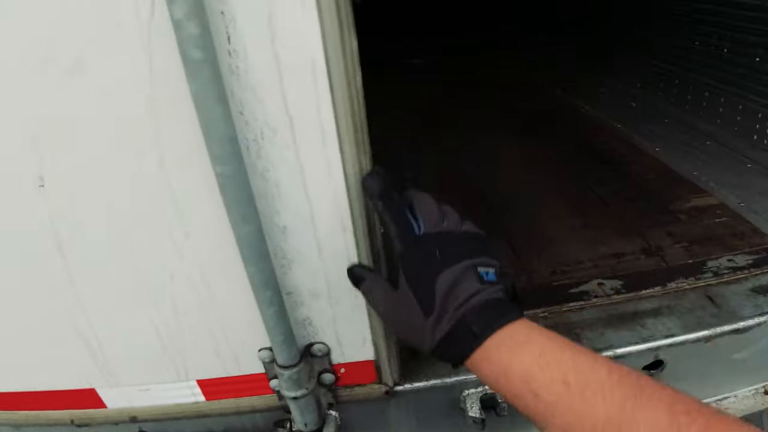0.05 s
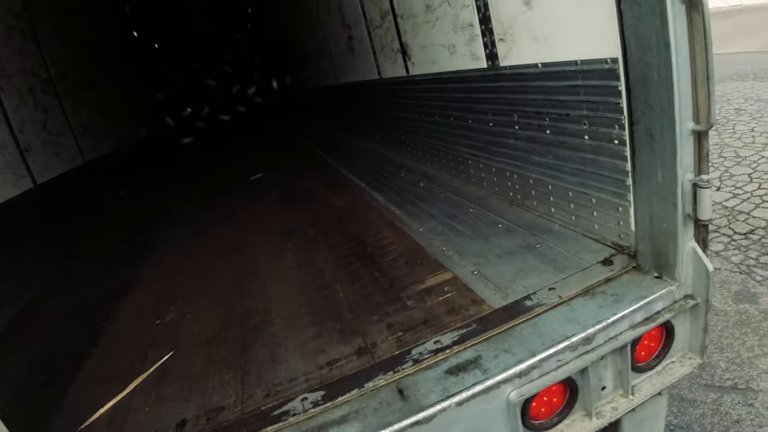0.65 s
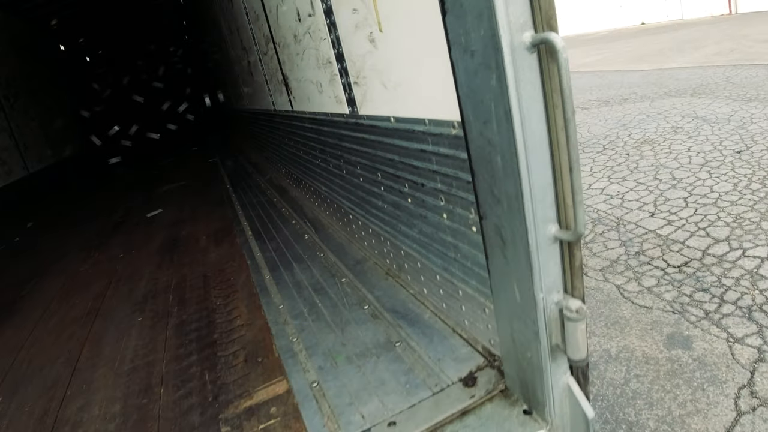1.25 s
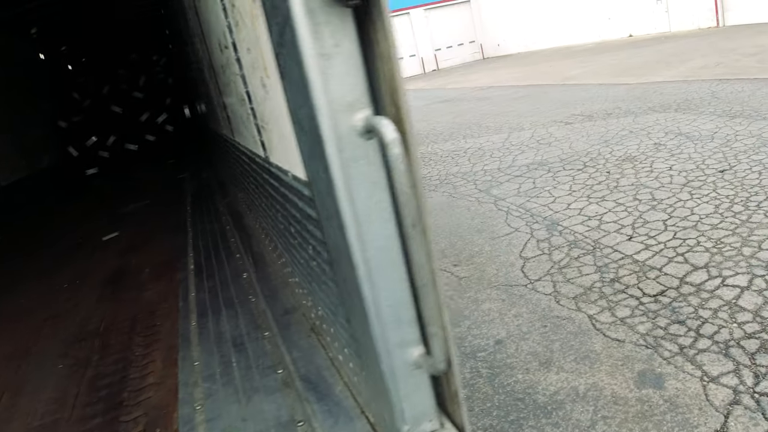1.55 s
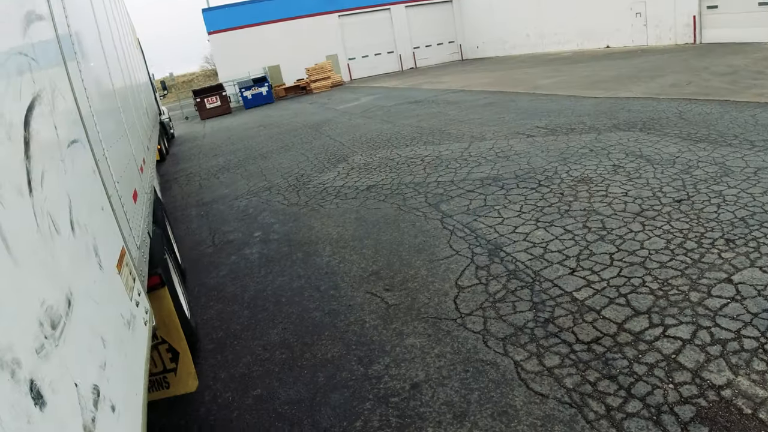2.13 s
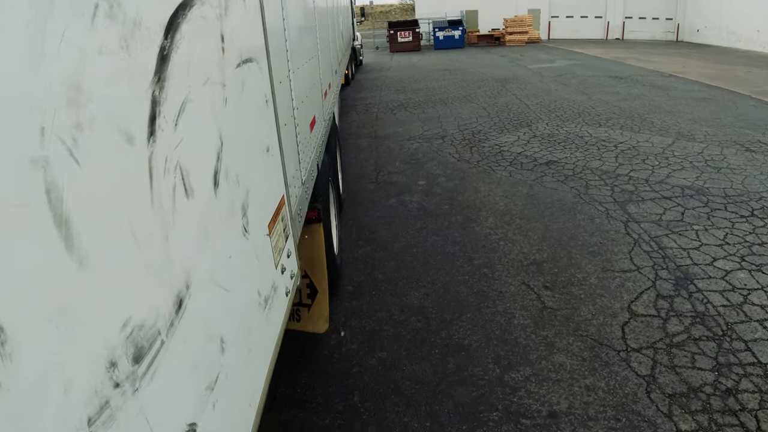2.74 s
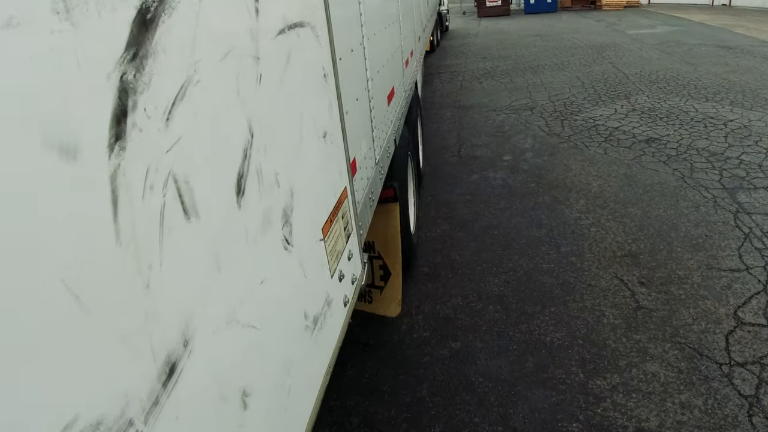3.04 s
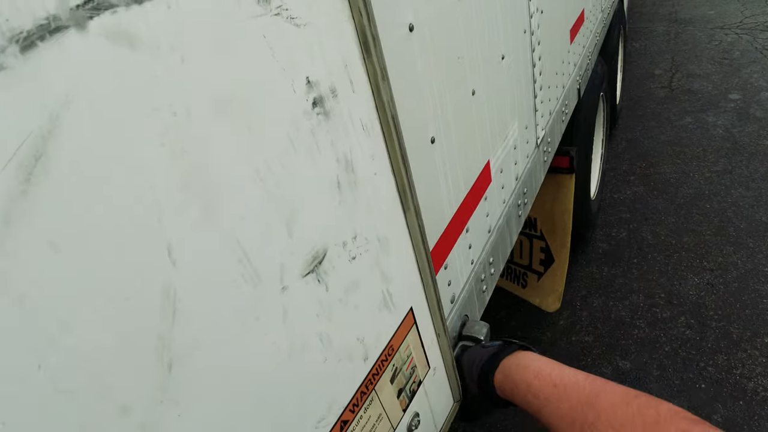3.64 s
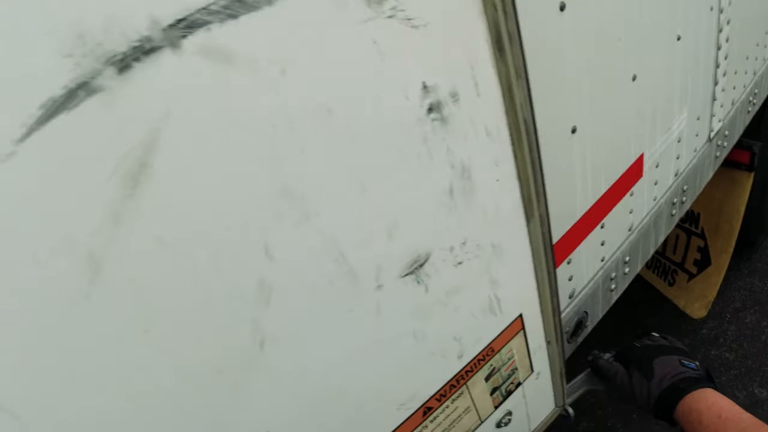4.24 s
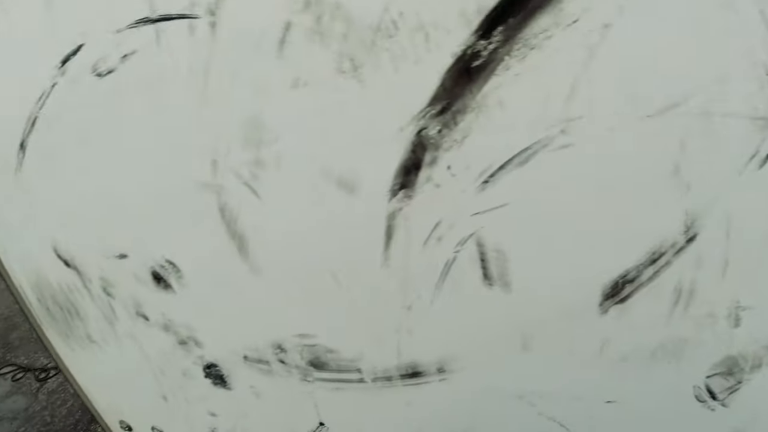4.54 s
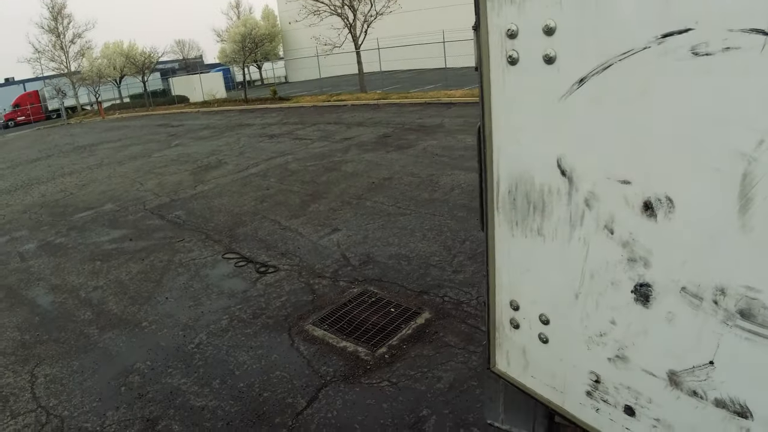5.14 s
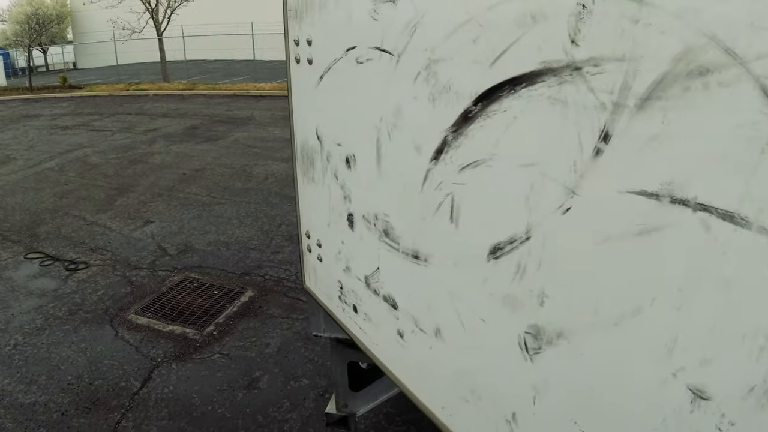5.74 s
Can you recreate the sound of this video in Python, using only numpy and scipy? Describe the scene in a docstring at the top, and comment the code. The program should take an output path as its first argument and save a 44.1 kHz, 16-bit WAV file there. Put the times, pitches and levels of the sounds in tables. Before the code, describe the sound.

A glove rubs a trailer door, then its steel hook clanks, rattles and booms against the panel, over a truck idling.

```python
"""A paved lot, a truck idling; a close pair of microphones is walked along by a tall trailer door.
First a glove rubs the panel and hisses off its edge; steps thump and the door scrapes, swung by hand.
From 3.7 s, close up, the steel hold-back hook clanks, chatters, squeaks and snaps at its keeper,
and each blow sets the panel booming against the hollow trailer.
At 5.6 s the latch clicks home with a last clank and boom, and the engine idles on."""
import sys
import numpy as np
from scipy import signal
from scipy.fft import irfft, next_fast_len
from scipy.io import wavfile
from scipy.ndimage import uniform_filter1d, minimum_filter1d

SR = 44100
rng = np.random.default_rng(int(sys.argv[2]) if len(sys.argv) > 2 else 0)


def file_out(sig):
    """Save sig as 16-bit WAV at sys.argv[1]."""
    # one column per channel
    cols = np.atleast_2d(sig).T
    # limit, then scale
    lim = np.clip(cols, -1, 1)
    pcm = np.round(lim * 32767).astype(np.int16)
    wavfile.write(sys.argv[1], SR, pcm)


N = 263718
TIME = np.arange(N) / SR

# how alike the two microphones hear diffuse sound: f/Hz, correlation
MIC_LIKENESS = [(25, .75), (60, .85), (130, .965), (300, .98), (640, .94), (1400, .62), (2400, .15),
                (4000, -.05), (8000, .05), (16000, .1)]
# the idling engine's spectrum: f/Hz, relative level/dB
ENGINE_SPECTRUM = [(15, -33), (27, -6.5), (55, 1), (78, -3.5), (105, -5.5), (190, -11.5), (270, -9),
                   (360, -21), (450, -13.5), (600, -18), (930, -16), (1310, -21.5), (2000, -29),
                   (2560, -35.5), (3260, -36), (4040, -45), (9000, -59), (14000, -64.5), (15500, -86.5)]
# peaks on that spectrum: f/Hz, width/Hz, boost/dB
ENGINE_RESONANCES = [(109.5, 19, 8.5), (915, 35, 0), (3300, 130, 1.5), (6030, 160, 6.5), (7860, 75, 7)]
# the engine as the trailer hides or uncovers it: t/s, rumble/dB, body/dB, clatter/dB, hiss/dB
ENGINE_LEVELS = [(.5, -43, -45, -57.5, -75.5), (.82, -38.5, -44, -57.5, -71),
                 (1.08, -42, -43.5, -59.5, -80), (1.3, -42, -42.5, -56.5, -75),
                 (1.8, -42.5, -43.5, -58, -76), (2.05, -38.5, -43, -54, -72.5),
                 (2.25, -35.5, -40, -51, -67), (2.55, -35, -42.5, -52, -74.5),
                 (2.78, -34.5, -40.5, -50.5, -70), (3.35, -27, -36.5, -48, -66.5),
                 (4.6, -33, -36.5, -49, -68), (5.05, -39, -41, -53.5, -68),
                 (5.45, -37.5, -40.5, -55.5, -68), (5.9, -27.5, -37, -50, -63.5)]
# echoes off the trailer and the ground: delay/s, gain
REFLECTIONS = [(.0055, .33), (.012, .2), (.027, .3)]
# machinery walked past: f/Hz, width/Hz, far level/dB, swell/dB, nearest t/s, passing time/s
MACHINE_DRONES = [(89.3, 6.7, -54, 15.5, 4.3, 1.6), (110.3, 6.3, -52.5, 20.5, 4.79, 0.32),
                  (189.5, 16, -51, 8, 1.1, 0.42), (705, 180, -61, 24.5, 3.4, 1.34),
                  (708, 12, -65, 27.5, 3.5, .8), (708, 10, -65.5, 19.5, 5.2, .2),
                  (6000, 110, -99, 21, 5.4, .8), (7860, 30, -98, 19, 3.7, 0.73)]
# a hum that comes and goes as the microphones move: t/s, level/dB
HUM_LEVELS = [(.1, -52), (.35, -42.5), (.6, -52), (.85, -46), (1.3, -51), (1.6, -47.5), (1.85, -49),
              (2.05, -49), (2.25, -42.5), (2.5, -38), (2.8, -39.5), (3.0, -48), (3.5, -43), (4.6, -45.5),
              (5.05, -56), (5.9, -52)]
# steps and handling: t/s, level/dB, centre f/Hz
SOFT_THUMPS = [(0.774, -30.5, 135), (1.204, -30, 110), (2.101, -27, 103), (2.69, -28, 203),
               (3.154, -22, 108.3), (3.481, -23.5, 152), (5.031, -26, 110), (5.177, -23.5, 115.4)]
# the swinging door scrapes: t/s, hold/s, level/dB, rasp f/Hz, rasp boost/dB
DOOR_SCRAPES = [(1.195, 0.41, -59.5, 2930, 6), (2.78, 1, -57.5, 3200, 13), (4.402, .17, -51.5, 2750, 9),
                (5.91, .1, -45.5, 3150, 14)]
# spectra of that scrape, the glove on the panel and the glove on the edge: f/Hz, relative level/dB
SCRAPE_SPECTRUM = [(1200, -18), (2200, 3), (2800, 1.5), (3400, -3), (4000, -17), (6000, -23), (12000, -53)]
RUB_SPECTRUM = [(25, -23), (60, 1), (150, -8.5), (320, -2.5), (500, -10.5), (630, -8.5), (750, -9),
                (930, -5), (1400, -15.5), (2400, -18), (3300, -20), (6000, -41), (12000, -74)]
HISS_SPECTRUM = [(1200, -21), (2500, -5), (4500, 0.5), (6500, -4.5), (8400, -5.5), (10000, -12.5),
                 (13000, -20), (16000, -31)]
# the glove's strokes along the edge: t/s, attack/s, hold/s, level/dB
EDGE_STROKES = [(0, 0.021, 0.058, -46), (0.07, 0.038, 0.018, -38)]
# loose hardware ticks: t/s, level/dB
HARDWARE_TICKS = [(1.215, -68), (1.285, -64), (1.678, -66), (1.704, -57.5), (1.727, -65), (1.916, -60),
                  (3.224, -62), (3.504, -59)]
# modes of the latch, hook, steel rods and door panel: f/Hz, relative level/dB, t60/s
LATCH_MODES = [(722, -11, .1), (1015, -9.5, 0.14), (1205, -5.5, 0.12), (1440, -9.5, .1), (1676, -9.5, .067),
               (1820, -10, .036), (2060, -8, 0.06), (2270, -4, 0.049), (2550, -7, .037), (3080, -18, .04),
               (3890, -5, 0.04), (4500, -7.5, 0.037), (4860, -13, 0.038), (5400, -15, .034),
               (5700, -14, 0.034), (6230, -19, .03), (6340, -19, .03), (6700, -20, .034),
               (7100, -19.5, .03), (7860, -28, .04), (8200, -26, .035)]
HOOK_MODES = [(1410, 5.5, 0.15), (1670, -0.5, 0.15), (1747, -1.5, 0.097), (2100, -4.5, .082),
              (2342, -5, 0.067), (2540, -5.5, 0.1), (2780, -4.5, .15), (2970, -5.5, .1),
              (3050, -2.5, 0.063), (3200, -2, 0.11), (3380, -1.5, 0.083), (3780, -7.5, 0.11),
              (4100, -11, 0.097), (4187, -12.5, .1), (4500, -14, .07)]
ROD_MODES = [(628, 9, 0.077), (659.4, 8, 0.056), (728, 0.5, .05), (753, 1, .1), (835, -0.5, 0.11),
             (891.4, 1.5, 0.14), (1100, -7.5, .06), (1220, -14, .06), (1300, -14, .07), (1510, -12.5, .07),
             (1740, -17, .08), (2300, -21.5, .08)]
PANEL_MODES = [(44.3, -13, 0.28), (60, -13, 0.29), (112.2, -5.5, .7), (134.3, -8.5, 0.3),
               (157.9, -5.5, 0.39), (178.3, 0, 0.47), (205.4, -2.5, .34), (241.4, -2, 0.21),
               (276.3, -3, 0.37), (319.8, 1.5, 0.3), (379.5, -1, 0.27), (438.8, 2, 0.24),
               (488.2, -1.5, .35), (531, -11.5, 0.19)]
# spectra of the hook's dense rattle and the snap of steel on steel: f/Hz, relative level/dB
RATTLE_SPECTRUM = [(700, -22.5), (1300, 5), (2000, -7.5), (2600, 2), (3000, -4.5), (3300, 3.5),
                   (3750, -7.5), (4400, -23), (5500, -30.5), (7000, -38.5), (8000, -37), (9000, -49.5),
                   (16000, -64.5)]
SNAP_SPECTRUM = [(1500, -26), (3500, 7), (4500, 4), (5800, -2.5), (7000, -11), (7700, -7.5), (8500, -0.5),
                 (9400, -21), (10300, -8), (12000, -23), (14000, -14), (16000, -39)]
# the hook binds, sagging in pitch and growing louder until it slips: t/s, f/Hz, level/dB
SQUEAK_PATH = [(3.965, 5600, -85), (3.975, 5480, -66), (3.985, 5200, -62), (3.992, 5190, -55),
               (3.999, 5200, -55), (4.003, 5230, -45), (4.008, 5240, -45), (4.013, 5230, -40),
               (4.018, 5250, -49), (4.024, 5250, -65), (4.032, 5250, -100)]
# the hook is dragged over its keeper: t/s, length/s, level/dB
HOOK_DRAGS = [(3.733, .125, -31), (4.222, .12, -32)]
# the loose panel flexes and rings in the modes near a pitch: t/s, level/dB, f/Hz
PANEL_FLEXES = [(3.735, -15, 178), (3.775, -18, 65), (3.782, -18, 235), (3.831, -19, 178),
                (3.835, -25, 105), (4.042, -18, 112), (4.075, -13.5, 241), (4.085, -15.5, 321),
                (4.13, -22, 206), (4.285, -18.5, 61), (4.31, -11.5, 61), (4.325, -14, 170),
                (4.335, -18, 275), (4.366, -13.5, 44), (4.402, -13.5, 437), (4.42, -21, 160),
                (4.545, -17.5, 165), (4.604, -15.5, 145), (4.70, -26, 112), (5.59, -18, 149),
                (5.628, -17.5, 112)]
# hook and rods strike: t/s, clank/dB, clank f/Hz, rattle/dB, rattle f/Hz, snap/dB, boom/dB, boom f/Hz
HOOK_BLOWS = [(3.705, -34, 700, -34.5, 2700, -72, -19, 218), (3.722, -11, 857, -19.5, 1600, -45, -14, 246),
              (3.753, -27, 1000, -37, 1500, -70, -17.5, 400),
              (3.777, -19.5, 850, -22.5, 2500, -64, -17.5, 239),
              (3.787, -25, 900, -29.5, 3600, -60, -20, 300),
              (3.809, -13.5, 860, -29, 1900, -69, -15.5, 178),
              (3.820, -10.5, 640, -32, 3000, -63, -29.5, 181),
              (3.829, -14.5, 686, -30, 4200, -45.5, -27, 177),
              (3.892, -15, 700, -32, 2600, -68, -16.5, 250),
              (3.955, -31.5, 900, -47, 1500, -67, -20.5, 320),
              (4.035, -21, 800, -25, 2490, -55, -21.5, 200), (4.0446, -14, 830, -17, 3100, -30, -8.5, 242),
              (4.053, -16.5, 950, -25.5, 3300, -26, -13.5, 260),
              (4.218, -26.5, 850, -45, 2000, -62.5, -17.5, 266),
              (4.264, -16.5, 860, -21.5, 3100, -43, -15.5, 250),
              (4.279, -20, 840, -29.5, 3350, -54.5, -13.5, 294),
              (4.3933, -12.5, 760, -38, 1890, -48, -11, 299),
              (5.5915, -13.5, 750, -33, 2200, -41.5, -21, 170),
              (5.601, -16.5, 720, -50, 1500, -66, -24, 400), (5.623, -26, 740, -56, 1500, -60, -21.5, 149)]

# each part's sound reaches the left microphone this much later
DOOR_LAG_MS, HOOK_LAG_MS, SNAP_LAG_MS, LATCH_LAG_MS = .049, .045, .076, .148
PANEL_WIDTH_HZ, ROD_WIDTH_HZ, HOOK_WIDTH_HZ = 13, 32, 60  # resonance widths under dense excitation


def gain_of(db):
    """Decibels to amplitude."""
    return 10 ** (np.asarray(db) / 20)


def unit_rms(x):
    """Scales to rms 1."""
    return x / np.sqrt(np.mean(x ** 2) + 1e-20)


def curve_at(points, hz):
    """Interpolates a curve on a log-frequency axis."""
    f, value = np.transpose(points)
    return np.interp(np.log(hz + 1), np.log(f + 1), value)


def fader(rows, column=1):
    """One dB column of a timed table as a gain for every sample."""
    rows = np.array(rows)
    return gain_of(np.interp(TIME, rows[:, 0], rows[:, column]))


def add(mix, s, sound):
    """Mixes a stereo sound in at time s."""
    part = mix[:, round(s * SR):][:, :sound.shape[1]]
    part += sound[:, :part.shape[1]]


def wander(rate_hz):
    """A random drift of rms 1."""
    knots = rng.standard_normal(2000)
    return unit_rms(np.interp(TIME * rate_hz, np.arange(len(knots)), knots))


def decay(t, t60, rise):
    """A quick, smooth rise and an exponential decay."""
    return (1 - np.exp(-2 * t / rise)) ** 2 * np.exp(-np.log(1000) * t / t60)


def envelope(start, attack, hold, fall_db_per_s):
    """A smooth attack, a hold, and a steady fall in dB."""
    t = TIME - start
    onset = np.sin(np.pi / 2 * np.clip(t / attack, 0, 1)) ** 2
    return onset * gain_of(-fall_db_per_s * np.maximum(t - attack - hold, 0))


def hump(hz, centre_hz, octaves):
    """A rounded rise about a centre, with sloping skirts, in dB."""
    distance = abs(np.log2((hz + 1) / centre_hz))
    return -10 * np.log10(1 + (distance / octaves) ** 2) - 6 * np.maximum(distance - 1, 0)


def lowpass(hz, top_hz):
    """A steep low-pass, in dB."""
    return -10 * np.log10(1 + (hz / top_hz) ** 10)


def peak(x, centre, width):
    """A resonance-shaped bell of height 1; width is taken at half height."""
    return 1 / (1 + (2 * (x - centre) / width) ** 2)


def resonances(modes, width_hz, hz):
    """The response of a set of modes, in dB."""
    return 10 * np.log10(sum(gain_of(db) ** 2 * peak(hz, f, width_hz) for f, db, _ in modes))


def noise(colour_db, size=N, lag_ms=0, direct=0):
    """Coloured noise of rms 1 at the pair: alike in the bass, in the treble only by its direct share."""
    padded = next_fast_len(size)
    hz = np.fft.rfftfreq(padded, 1 / SR)
    left, unrelated = np.exp(2j * np.pi * rng.random((2, len(hz))))
    likeness = np.clip(direct + (1 - direct) * curve_at(MIC_LIKENESS, hz), -1, 1)
    right = likeness * left + np.sqrt(1 - likeness ** 2) * unrelated
    pair = np.array([left * np.exp(-2j * np.pi * hz * lag_ms / 1000), right])
    return unit_rms(irfft(pair * gain_of(colour_db(hz)), padded)[:, :size])


def narrow_noise(centre_hz, width_hz):
    """A narrow band of noise with steep skirts."""
    return noise(lambda hz: 20 * np.log10(peak(hz, centre_hz, width_hz)))


def ring(modes, centre_hz, t, lag_ms, octaves, rise):
    """Damped modes at the pair; the place of the blow favours those near a centre."""
    hz, db, t60 = np.transpose(modes)[:, :, None]
    weights = gain_of(db + hump(hz, centre_hz, octaves))
    cycles = hz * rng.uniform(.992, 1.008, hz.shape) * t + rng.random(hz.shape)
    partials = weights * decay(t, t60, rise) * np.sin(2 * np.pi * cycles)
    wave = partials.sum(0) / np.linalg.norm(weights)
    return np.array([np.interp(t - lag_ms / 1000, t, wave), wave])


def engine():
    """The truck idles in the background in four fluttering bands, combed by trailer and ground echoes."""
    def colour(hz):
        peaks = sum(db * peak(hz, f, width) for f, width, db in ENGINE_RESONANCES)
        return curve_at(ENGINE_SPECTRUM, hz) + peaks

    def band(low_hz, high_hz, flutter_db):
        steady = noise(lambda hz: colour(hz) - 10 * np.log10(1 + (low_hz / (hz + 1)) ** 10)
                       + lowpass(hz, high_hz), lag_ms=.077)
        return steady * gain_of(flutter_db * (shared_flutter + wander(14)) / np.sqrt(2))

    shared_flutter = wander(45)
    rumble = band(20, 294, flutter_db=3) * fader(ENGINE_LEVELS, 1)
    body = band(280, 1384, flutter_db=1.44) * fader(ENGINE_LEVELS, 2)
    clatter = band(1590, 4540, flutter_db=1.9) * fader(ENGINE_LEVELS, 3)
    hiss = band(4260, 12000, flutter_db=1) * fader(ENGINE_LEVELS, 4)
    idle = rumble + body + clatter + hiss
    heard = idle.copy()
    for delay, gain in REFLECTIONS:  # the paths drift as the microphones move
        late = np.round((TIME - delay - .0003 * wander(1.2)) * SR).astype(int)
        heard += gain * idle[:, late % N]
    return heard


def drones():
    """Running machinery: each narrow band wavers by itself and swells as the microphones pass."""
    out = np.zeros((2, N))
    for hz, width_hz, far_db, swell_db, nearest_s, pass_s in MACHINE_DRONES:
        passing_db = far_db + swell_db * peak(TIME, nearest_s, 2 * pass_s)
        out += narrow_noise(hz, width_hz) * gain_of(passing_db + 1.5 * wander(15))
    return out


def hum(pitch_hz=463, waver_hz=4.5, flicker_db=1.6):
    """One fuzzy tone of the machinery, wavering in pitch and flickering in level."""
    tone = np.sin(2 * np.pi * np.cumsum(pitch_hz + waver_hz * wander(60)) / SR)
    fuzzy = unit_rms(tone) + .65 * narrow_noise(pitch_hz, width_hz=30)
    return unit_rms(fuzzy * gain_of(flicker_db * wander(16))) * fader(HUM_LEVELS)


def thumps():
    """Steps and handling reach the microphones as short, dull pushes of air."""
    t, out = np.arange(SR // 4) / SR, np.zeros((2, N))
    for s, db, centre_hz in SOFT_THUMPS:
        push = noise(lambda hz: 2 * hump(hz, centre_hz, octaves=.41), len(t))
        add(out, s, 1.32 * gain_of(db) * push * decay(t, t60=.2, rise=.017))
    return out


def scrape(rasp_width_hz=550, grain_db=2):
    """The door swings: dry, grainy friction rasps in one resonance of the steel."""
    out = np.zeros((2, N))
    for s, hold, db, rasp_hz, rasp_db in DOOR_SCRAPES:
        friction = noise(lambda hz: curve_at(SCRAPE_SPECTRUM, hz)
                         + rasp_db * peak(hz, rasp_hz, rasp_width_hz))
        out += friction * gain_of(db) * envelope(s, .028, hold, fall_db_per_s=149)
    return out * gain_of(grain_db * wander(200))


def glove(rub_db=-27, fade_db_per_s=47, buffet_db=-33):
    """A glove rubs the panel and hisses off its edge; air pushed by the door buffets the microphones."""
    pressure = gain_of(rub_db - fade_db_per_s * TIME) * envelope(0, .00067, .28, fall_db_per_s=194)
    rub = noise(lambda hz: curve_at(RUB_SPECTRUM, hz)) * pressure
    slide = sum(gain_of(db) * envelope(s, attack, hold, fall_db_per_s=102.5)
                for s, attack, hold, db in EDGE_STROKES)
    hiss = noise(lambda hz: curve_at(HISS_SPECTRUM, hz), direct=.19) * slide
    # a negative direct share makes the wind differ between the two microphones
    wind = noise(lambda hz: hump(hz, 79, octaves=.72) + lowpass(hz, 240), direct=-5)
    buffet = wind * gain_of(buffet_db) * envelope(0, .005, .086, fall_db_per_s=68)
    return (rub + hiss) * gain_of(1.1 * wander(181.5)) + buffet


def latch(click_s=5.592, click_db=-12):
    """The latch rings briefly as it drops home; before that, loose hardware ticks now and then."""
    t, out = np.arange(SR // 4) / SR, np.zeros((2, N))
    click = ring(LATCH_MODES, 1800, t, LATCH_LAG_MS, octaves=3.2, rise=.00059)
    add(out, click_s, gain_of(click_db) * click)
    for s, db in HARDWARE_TICKS:
        tick = noise(lambda hz: curve_at(SNAP_SPECTRUM, hz), len(t))
        add(out, s, gain_of(db) * tick * decay(t, t60=.071, rise=.001))
    return out


def zing(start_s=3.772, db=-61.5):
    """A thin, high ring of steel sliding on steel."""
    band = narrow_noise(centre_hz=7780, width_hz=1000)
    return gain_of(db) * band * envelope(start_s, attack=.008, hold=.02, fall_db_per_s=170)


def squeak():
    """The hook's dry steel sticks and slips at one high, rough pitch."""
    s, hz, _ = np.transpose(SQUEAK_PATH)
    pitch = np.interp(TIME, s, hz) * (1 + .011 * wander(900))
    grip = gain_of(2.5 * wander(300))
    tone = unit_rms(np.sin(2 * np.pi * np.cumsum(pitch) / SR) * grip)
    return tone * fader(SQUEAK_PATH, 2) * (TIME > s[0]) * (TIME < s[-1])


def shudder(start_s=3.717, db=-25):
    """The big panel rumbles in its modes while the hook is worked, then dies away."""
    rumble = noise(lambda hz: .6 * resonances(PANEL_MODES, PANEL_WIDTH_HZ, hz)
                   + hump(hz, 70, octaves=1) + lowpass(hz, 328), direct=.1)
    return gain_of(db) * rumble * envelope(start_s, attack=.26, hold=.64, fall_db_per_s=68.5)


def boom(db, centre_hz, octaves):
    """The panel swells behind a blow and the hollow trailer drones on in the same modes."""
    t = np.arange(2 ** 15) / SR
    panel = ring(PANEL_MODES, centre_hz, t, DOOR_LAG_MS, octaves, rise=.0039)
    push = noise(lambda hz: 1.25 * hump(hz, centre_hz, .58) + lowpass(hz, 2500), len(t), direct=.4)
    hollow = noise(lambda hz: resonances(PANEL_MODES, PANEL_WIDTH_HZ, hz)
                   + hump(hz, centre_hz, .88), len(t))
    return gain_of(db) * (panel + .7 * push * decay(t, .098, .0031) + .14 * hollow * decay(t, .98, .037))


def rod_clank(t, centre_hz):
    """The steel rods ring under a noisy clash with a faint tail."""
    modes = ring(ROD_MODES, centre_hz, t, DOOR_LAG_MS, octaves=.081, rise=.00076)
    clash = noise(lambda hz: .38 * resonances(ROD_MODES, ROD_WIDTH_HZ, hz) + lowpass(hz, 4000)
                  + 1.1 * hump(hz, centre_hz, .81), len(t), DOOR_LAG_MS, direct=.22)
    return modes + clash * (.82 * decay(t, .065, .0045) + .082 * decay(t, .71, .014))


def hook_rattle(t, centre_hz):
    """The hook rings and clatters in the modes that the blow favours."""
    modes = ring(HOOK_MODES, centre_hz, t, HOOK_LAG_MS, octaves=.3, rise=.0017)
    clatter = noise(lambda hz: curve_at(RATTLE_SPECTRUM, hz) + hump(hz, centre_hz, .68)
                    + .32 * resonances(HOOK_MODES, HOOK_WIDTH_HZ, hz), len(t), HOOK_LAG_MS, direct=.55)
    return .62 * modes + clatter * (.83 * decay(t, .041, .00086) + .04 * decay(t, .34, .022))


def contact_snap(t, db):
    """Steel snaps on steel; a harder blow has a shorter contact and reaches higher."""
    top_hz = 4800 * 2 ** ((db + 48) / 10)
    snap = noise(lambda hz: curve_at(SNAP_SPECTRUM, hz) + lowpass(hz, top_hz),
                 len(t), SNAP_LAG_MS, direct=.32)
    crack = 1.8 * decay(t, t60=.0074, rise=.0004)
    return gain_of(db) * snap * (crack + 1.2 * decay(t, .057, .00081) + .016 * decay(t, .2, .01))


def strike(clank_db, clank_hz, rattle_db, rattle_hz, snap_db):
    """One contact sounds the rods, the hook and the point where the steel meets."""
    t = np.arange(2 ** 14) / SR
    clank = gain_of(clank_db) * rod_clank(t, clank_hz)
    rattle = gain_of(rattle_db) * hook_rattle(t, rattle_hz)
    return clank + rattle + contact_snap(t, snap_db)


def chatter(contacts=8):
    """Dragged over its keeper, the hook makes small, irregular contacts between the blows."""
    out = np.zeros((2, N))
    for s, length, drag_db in HOOK_DRAGS:
        for k in range(contacts):
            db = drag_db + rng.uniform(-7, 5)
            contact = strike(db, clank_hz=900, rattle_db=db - 9, rattle_hz=2000, snap_db=db - 35.5)
            add(out, s + length * (k + rng.random()) / contacts, contact)
    return out


def door(bounce_s=.0095, bounce_db=-10, recoil_s=.036, recoil_db=-7):
    """Close up, each blow clanks, bounces once and booms the panel to and fro; the panel also flexes."""
    out = np.zeros((2, N))
    for s, *steel, boom_db, boom_hz in HOOK_BLOWS:
        add(out, s, strike(*steel))
        add(out, s + bounce_s, gain_of(bounce_db) * strike(*steel))
        add(out, s + .008, boom(boom_db, boom_hz, octaves=.28))  # the heavy panel answers late
        add(out, s + recoil_s, boom(boom_db + recoil_db, .67 * boom_hz, octaves=.24))  # deeper swing back
    for s, db, centre_hz in PANEL_FLEXES:
        add(out, s, boom(db, centre_hz, octaves=.07))
    return out


def scene():
    """The door and its handling up front, the engine and machinery behind."""
    foreground = door() + chatter() + shudder() + latch() + squeak() + zing() + scrape() + glove()
    return foreground + thumps() + engine() + drones() + hum()


def record(dry, ceiling=.63, top_hz=15700):
    """Behind the microphones, a fast limiter holds down the peaks and a low-pass trims the top."""
    allowed = np.minimum(1, ceiling / (abs(dry).max(0) + 1e-9))
    limited = dry * uniform_filter1d(minimum_filter1d(allowed, size=301), size=301)
    band_limit = signal.firwin(511, top_hz, window=("kaiser", 9), fs=SR)
    return signal.oaconvolve(limited, band_limit[None], "same")


dry = scene()
out = record(dry)
file_out(out)
```